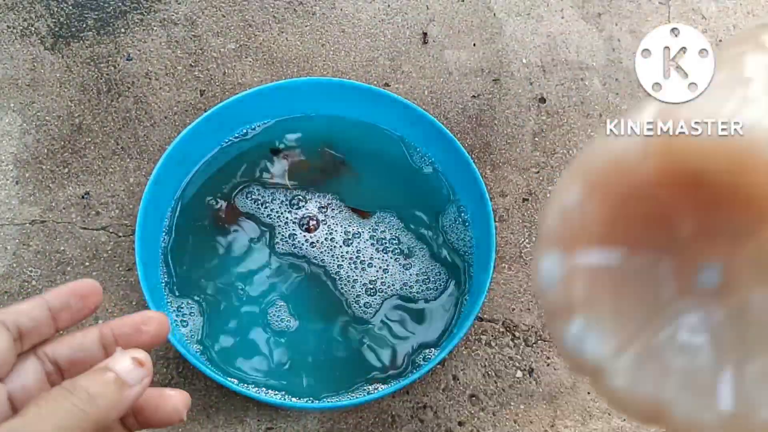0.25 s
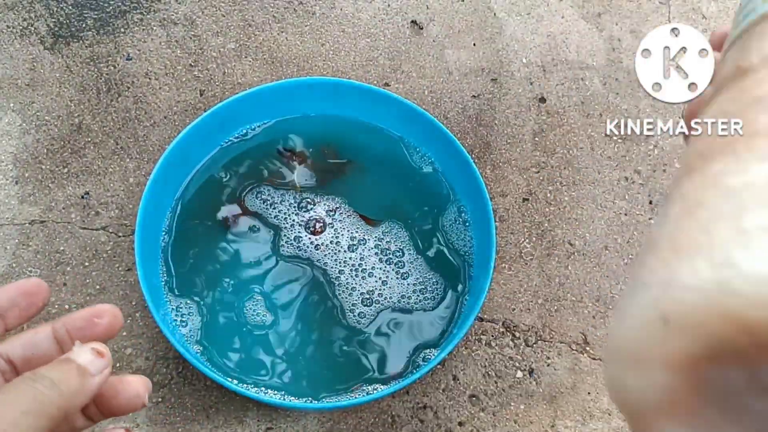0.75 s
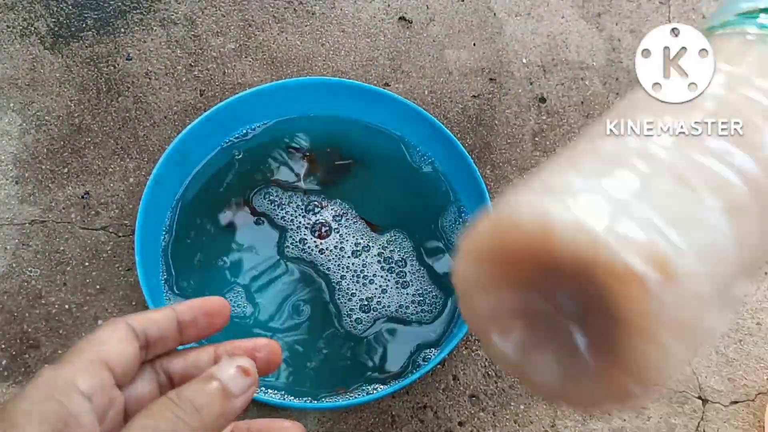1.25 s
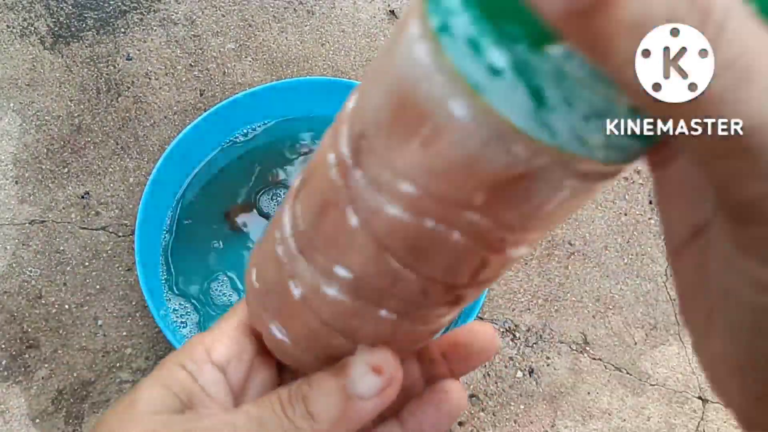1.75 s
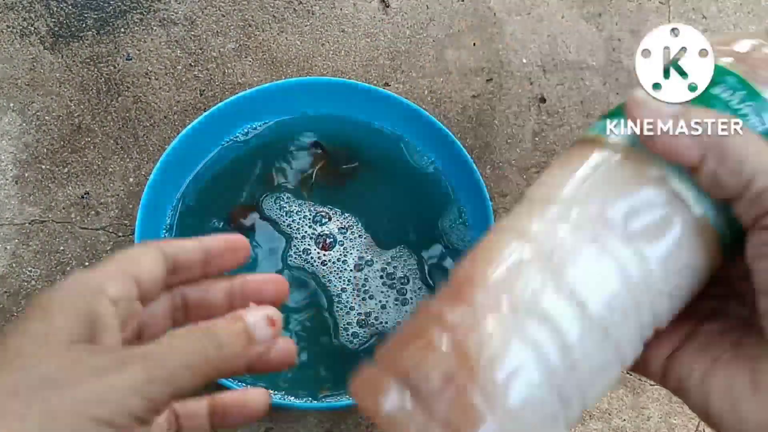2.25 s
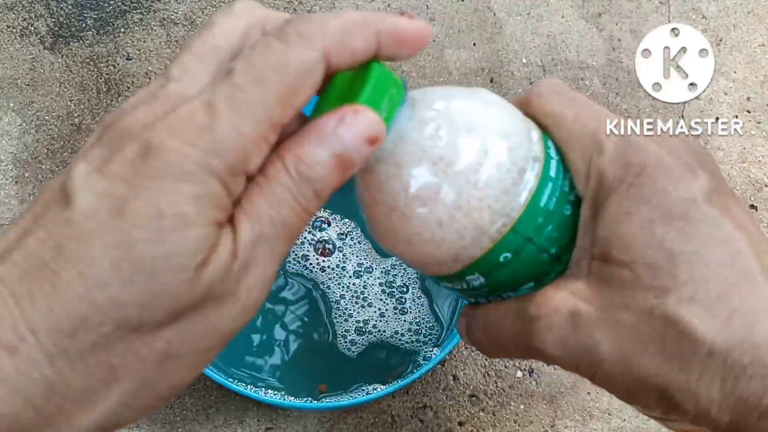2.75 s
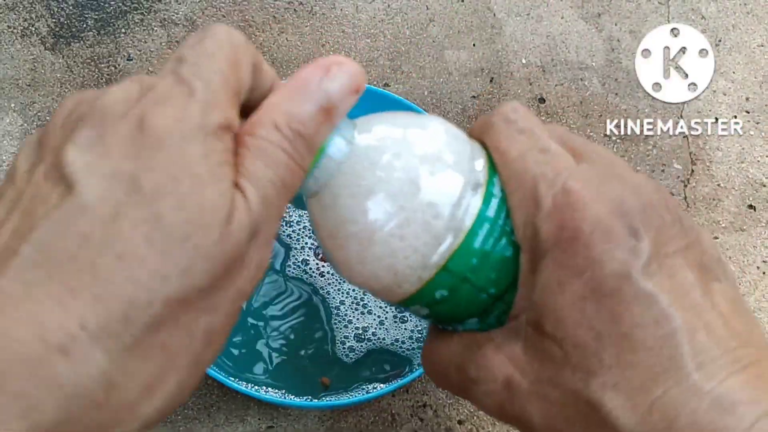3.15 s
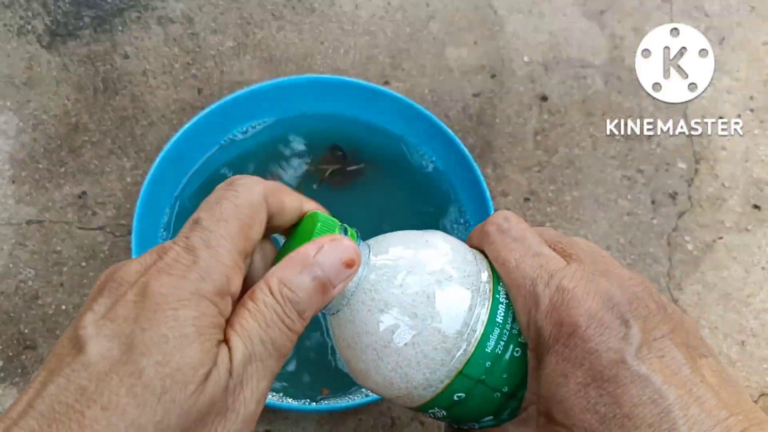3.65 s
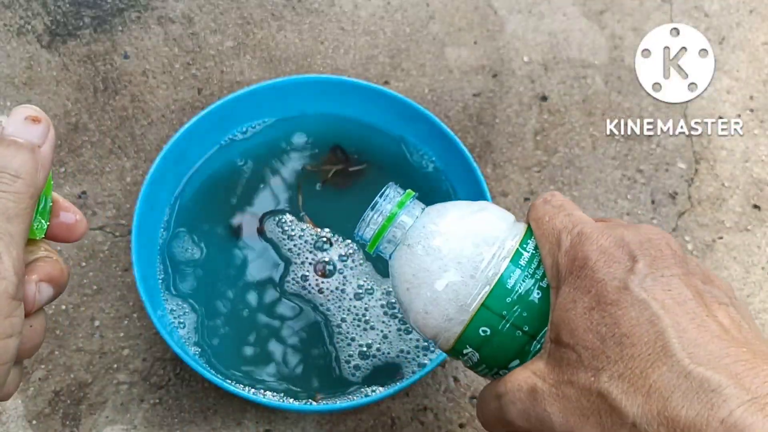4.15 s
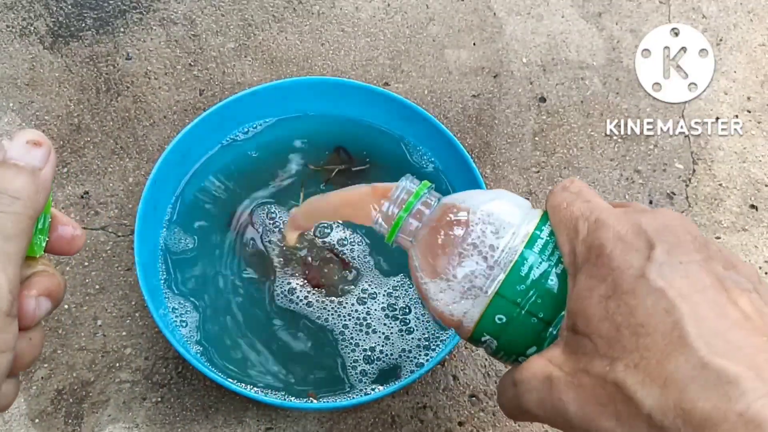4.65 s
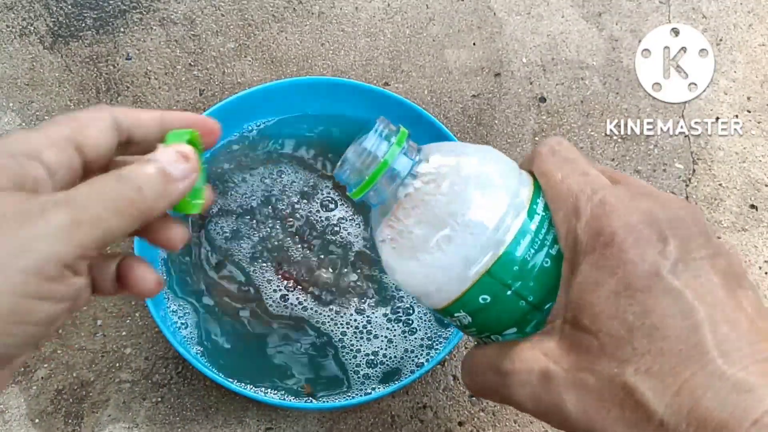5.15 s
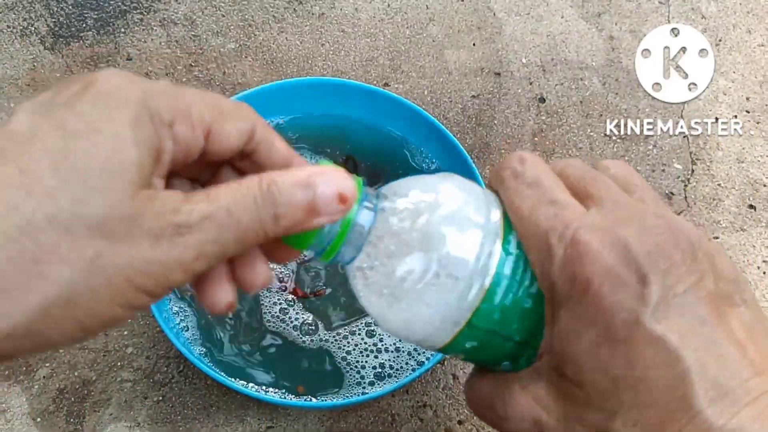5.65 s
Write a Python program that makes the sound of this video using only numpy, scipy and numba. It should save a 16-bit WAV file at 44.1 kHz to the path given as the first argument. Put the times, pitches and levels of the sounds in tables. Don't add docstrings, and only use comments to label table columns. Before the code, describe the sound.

Froth sloshes in a flexing plastic bottle, cap clicks open, liquid gurgles briefly into a water basin, and the cap clicks back on.

```python
import sys
import numpy as np
from scipy import signal
from scipy.fft import rfft, irfft, next_fast_len
from scipy.io import wavfile
from scipy.ndimage import uniform_filter1d
from numba import njit

SR = 44100
rng = np.random.default_rng(int(sys.argv[2]) if len(sys.argv) > 2 else 0)


def gain_from_db(level_db):
    decades = np.asarray(level_db, float) / 20
    return 10 ** decades


def wav_out(sig):
    wavfile.write(sys.argv[1], SR, np.round(np.clip(np.atleast_2d(sig).T, -1, 1) * 32767).astype(np.int16))


N = 260631

# frequency [Hz], density [dB per Hz].
TOWN_SPECTRUM = [(20, -1.5), (154, -16), (290, -23), (624, -28.5), (800, -32.5), (2500, -38), (7000, -49.5),
                 (15500, -47.5)]
# pitch [Hz], width [Hz], level [dB].
MACHINES = [(57.3, 12.4, -51.5), (122.3, 3.4, -62), (159.2, 8.5, -63.5)]
# start [s], level [dB], top frequency [Hz], decay [s].
KNOCKS = [(0.659, -45, 89, 0.085), (1.23, -47.5, 98, 0.095), (3.47, -48, 105, 0.12),
          (4.052, -42, 108.2, 0.057)]
# frequency [Hz], width [Hz], level [dB], left minus right [dB].
WALL_MODES = [(1760, 500, -7, -2), (2240, 160, 2, -4), (2900, 1650, -7, 1), (3800, 450, -3.5, -0.5),
              (4170, 300, -6.5, -1.5), (5100, 367, -8.5, -2), (5870, 2000, -10, -9.5),
              (7400, 810, -6, -2.5), (7900, 1100, -9, 0.5), (11600, 6000, -16.5, -3)]
# peak time [s], peak level [dB], rise over 10 dB [s], fall over 10 dB [s],
# heavy slap re peak [dB].
SHAKES = [(0.015, -42, 0.12, 0.022, -12), (0.09, -54, 0.074, 0.12, -1.5), (0.206, -47.5, 0.0041, 0.019, -1),
          (0.232, -47, 0.02, 0.045, -5), (0.308, -56, 0.0095, 0.065, 4.5), (0.48, -54, 0.04, 0.089, -5),
          (0.6, -63.5, 0.035, 0.081, 3), (0.694, -56, 0.015, 0.08, -13), (0.94, -64.5, 0.063, 0.063, -3.5),
          (1.026, -64, 0.01, 0.056, -7), (1.095, -81.5, 0.0088, .06, -4)]
TURNS = [(1.49, -68, 0.088, .15, -4), (1.642, -61, 0.034, 0.0088, -3.5), (1.79, -68, 0.052, 0.044, 2),
         (1.946, -69, 0.022, .03, -4), (2.005, -61, 0.037, 0.065, -17), (2.114, -54, 0.012, 0.022, -15),
         (2.152, -67.5, 0.014, 0.065, -1), (2.258, -68.5, 0.024, .1, -1.5), (2.55, -72, 0.23, .25, -2),
         (2.85, -71, 0.076, 0.5, -14), (5.8, -62, 0.086, 0.052, -3), (5.91, -66.5, 0.03, .04, -3)]
RUBS = [(2.76, -67.5, 0.04, 0.036, -5), (3.0, -75, 0.092, 0.15, 7), (3.135, -57, 0.02, 0.036, -21),
        (3.2, -64, 0.065, 0.049, -8), (3.28, -58, 0.024, 0.042, -7), (3.43, -58, 0.011, 0.021, -20),
        (3.465, -60.5, .02, 0.044, -18), (3.53, -50, 0.02, 0.012, 1), (5.25, -51, 0.027, 0.03, -3.5),
        (5.392, -58, 0.0078, 0.019, 3.5), (5.5, -58.5, 0.062, 0.029, -1), (5.56, -67, 0.047, .05, -2),
        (5.722, -54.5, 0.018, 0.029, 0.5)]
# start [s], peak [dB], dent pitch [Hz], treble re peak [dB], thud re peak [dB].
WALL_CRACKS = [(0.2924, -52, 3080, -5, -15), (0.519, -50, 3200, 14, -15), (0.609, -7, 3774, -4.5, -22),
               (0.7934, -40.5, 3160, 16, -4), (1.028, -43.5, 3300, -8, -19), (1.6326, -51, 3170, 0, -18),
               (1.642, -51, 2900, -14, -4), (2.0993, -55, 2200, -5, -19), (0.1785, -50, 4500, -11, -27),
               (0.1925, -48, 3070, -3, -27), (0.2039, -39, 2190, -12, -22), (0.2239, -35, 2270, 0, -19),
               (0.235, -41, 2280, -12, -22), (0.263, -41, 5000, -6, -26), (0.3277, -44, 3990, -10, -9),
               (0.4434, -45, 2250, -16, -18), (0.4633, -46, 2250, -8, -20), (0.5462, -47, 6600, 0, -22),
               (0.009, -36, 4200, -4, -24), (0.022, -43, 2250, -4, -15), (2.255, -56, 2050, -20, -25),
               (2.478, -52, 2250, -20, -14), (2.712, -63, 2000, -20, -13)]
OPENING_CRACKS = [(3.081, -28.5, 2160, -22, -24), (3.1145, -6.5, 2140, -4, -24),
                  (3.1724, -43.5, 2100, -22, -21), (3.187, -45, 2330, -22, -16),
                  (3.2735, -41, 2140, -28, -12), (3.3075, -45.5, 2260, -23, -14),
                  (3.4235, -47, 2180, -19, -38), (3.427, -45.5, 2030, -22, -33),
                  (3.4305, -41.5, 2240, -22, -30), (3.4345, -46, 1880, -20, -23),
                  (3.4385, -53, 2120, -20, -30), (3.487, -51, 2230, -26, -30), (3.490, -51, 2290, -26, -30),
                  (3.5093, -37.5, 2010, -22, -32), (3.5145, -46, 2150, -26, -30),
                  (3.5242, -33, 2200, -13, -16), (3.5286, -36, 2050, -24, -20),
                  (3.531, -41, 2050, -24, -23), (3.548, -51, 2200, -24, -22), (3.5529, -53, 2240, -22, -24),
                  (4.2805, -40.5, 2600, -5, -33)]
CLOSING_CRACKS = [(5.1545, -32.5, 2120, -31, -12.5), (5.197, -51, 1800, -25, -18),
                  (5.2134, -47, 1870, -25, -20), (5.221, -49, 1700, -25, -8), (5.239, -45, 2150, -20, -8),
                  (5.364, -50.5, 2300, -28, -17), (5.2352, -39, 2160, 6, -21), (5.248, -41, 2170, -22, -12),
                  (5.2643, -40, 2300, -10, -13), (5.2877, -43, 2250, -17, -14),
                  (5.3902, -39.5, 1760, -24, -19), (5.4719, -30, 1500, -8, -5),
                  (5.4742, -15, 2300, -12, -11), (5.478, -18.5, 2200, -11.5, -24),
                  (5.486, -35, 2600, -15, -16), (5.5933, -26.5, 2540, -28, -23),
                  (5.717, -33.5, 2040, -35, -15.5), (5.7254, -44, 2470, -31.5, -7),
                  (5.745, -43.5, 2000, -27, -27)]
# frequency [Hz], width [Hz], level [dB],
# left minus right [dB].
FREE_WALL_MODES = [(326, 310, -2.5, -1), (595, 184, -2, -9), (906, 280, -1.5, -7.5), (1635, 120, 0, 0),
                   (2240, 200, 7.5, -6.5), (2530, 253, 8, 0.5), (3300, 430, -19, -8), (4266, 280, 3, -3.5),
                   (4590, 215, -0.5, -6), (5850, 1100, -1.5, -5), (6580, 460, 0, -12.5),
                   (7640, 1100, -3.5, -3), (9500, 3100, -8.5, 2.5), (180, 120, -3, 0)]
TIGHT_CAP_MODES = [(604, 120, 2, 4), (260, 120, -3, 0), (1066, 230, 2.5, -4), (1300, 210, -14, 6),
                   (1800, 390, -10, -3.5), (2200, 247, 2, 2.5), (3450, 360, -1, 6.5), (4110, 490, -6.5, -4),
                   (4700, 400, -2.5, -4.5), (6300, 650, -5, -1), (6800, 360, 2.5, 0), (7300, 700, -1, 0.5),
                   (8540, 1500, -8.5, 3.5), (160, 99, -2, -0.5)]
LOOSE_CAP_MODES = [(340, 100, 1.5, 2), (1210, 335, 2.5, 8.5), (950, 220, 4, -2), (1500, 740, -12.5, 1),
                   (2250, 260, -5.5, 2.5), (3250, 250, 1, -3), (3560, 260, -0.5, -3), (4150, 370, -9, 2),
                   (5400, 390, 3, -2), (6500, 750, -3, -9), (8100, 400, 1.5, 7), (10200, 3800, -7, 5),
                   (190, 97, -6, -3)]
# dent left minus right [dB], ribs [dB], contact band width [Hz],
# ground echo [dB], basin echo [dB], tail [dB].
GRIPS = [
    (-11, -5, 5800, -14, -21.5, -13),
    (4, -6, 2000, -22.5, -16, -2),
    (-5.5, -4, 1800, -14, -21, -1.5),
]
# start [s], length [s], start pitch [Hz], end pitch [Hz], level [dB].
BIRD_NOTES = [(0.275, 0.165, 4080, 3750, -65), (0.419, 0.13, 3690, 3750, -68.5),
              (1.429, 0.19, 1620, 1660, -74.5), (1.545, 0.057, 4350, 5300, -71),
              (1.577, 0.1, 5300, 5300, -74), (2.249, 0.22, 3980, 3530, -71), (2.409, 0.13, 3650, 5300, -68),
              (2.482, 0.05, 5460, 5660, -65), (2.547, .055, 5530, 5560, -74),
              (2.508, 0.033, 3050, 3070, -57.5), (2.754, 0.034, 2900, 2850, -59),
              (2.822, 0.16, 1280, 1200, -64.5), (2.799, 0.07, 1017, 1060, -69),
              (2.865, 0.044, 3020, 2980, -67), (2.753, .03, 1660, 1640, -66), (2.75, .03, 2250, 2240, -66),
              (2.972, 0.08, 1190, 976, -72), (3.01, .05, 1560, 1480, -73), (3.279, 0.0097, 2950, 2950, -56),
              (3.304, 0.12, 3760, 3740, -72.5), (3.455, 0.033, 4150, 4400, -65),
              (3.018, 0.024, 2965, 2900, -54), (3.047, 0.046, 2950, 2900, -61),
              (5.006, 0.11, 1265, 1203, -69.5), (5.599, 0.13, 1250, 1206, -72)]
# time [s], level [dB].
FLOW = [
    (4.22, -38),
    (4.3, -7),
    (4.39, -1.5),
    (4.52, 3),
    (4.7, -3),
    (4.88, -6),
    (4.98, -19),
]
# start [s], peak [dB], pitch [Hz], ring t60 [s].
GLUGS = [(3.428, -52.5, 520, 0.07), (4.314, -47, 746, 0.017), (4.366, -38, 957, 0.027),
         (4.383, -59, 890, 0.025), (4.409, -40.5, 870, 0.018), (4.431, -61, 950, 0.025),
         (4.462, -50, 950, 0.055), (4.47, -36.5, 1024, 0.026), (4.475, -43.5, 835, 0.028),
         (4.504, -41, 990, 0.024), (4.524, -40, 974, 0.025), (4.531, -43, 910, 0.018),
         (4.552, -31.5, 905, 0.0077), (4.563, -45, 1010, 0.018), (4.572, -52, 934, 0.023),
         (4.604, -48, 930, 0.026), (4.622, -30.5, 915, 0.0089), (4.636, -49, 1010, 0.043),
         (4.655, -32.5, 970, 0.011), (4.667, -50, 914, 0.027), (4.679, -54, 1060, 0.039),
         (4.782, -45, 930, 0.027), (4.836, -45, 1210, 0.014), (4.865, -34.5, 718, 0.054),
         (4.888, -51, 745, 0.038), (4.911, -50.5, 900, 0.015), (4.724, -57, 900, 0.014),
         (4.738, -52, 950, .018)]
# start [s], peak [dB], pitch [Hz], left minus right [dB].
BEADS = [(4.2633, -48, 4500, 2), (4.2797, -41.5, 2320, 8.5), (4.3136, -40, 9550, 10.5),
         (4.316, -40.5, 4800, 1.5), (4.328, -35.5, 3700, 3.5), (4.3521, -61, 1680, 4),
         (4.391, -41, 2420, 8), (4.391, -36, 5060, -3.5), (4.4317, -41, 3300, -0.5),
         (4.464, -41, 2030, 1.5), (4.4913, -28, 3410, 3.5), (4.525, -41, 3260, 15), (4.551, -37, 6030, 3),
         (4.614, -52, 1910, 1), (4.6378, -47, 1640, 3), (4.6529, -50, 1760, 2), (4.6864, -47, 8500, 8.5),
         (4.7218, -41, 3300, 3.5), (4.722, -51, 7340, 10), (4.791, -45, 8100, 5),
         (4.7916, -44.5, 7200, 13.5), (4.8255, -50, 1980, 2), (4.862, -51, 1800, 11),
         (4.862, -46.5, 7400, 12), (4.888, -54, 1610, 14), (4.5287, -39, 2060, 2.5), (4.766, -56, 5700, 3),
         (4.8016, -46, 6000, 3), (4.828, -44, 3800, 2), (4.855, -48, 2000, 0), (4.873, -45, 1800, -1),
         (4.889, -43, 2630, 1), (4.911, -51, 2820, -1), (4.383, -44, 3000, 0)]
# start [s], peak [dB].
SPLASHES = [(4.2921, -42.5), (4.3141, -38), (4.3909, -52), (4.5454, -38), (4.5501, -35.5), (4.557, -36),
            (4.6214, -46), (4.6528, -43), (4.6867, -51), (4.7132, -49), (4.7595, -45), (4.8884, -44),
            (4.3521, -46), (4.416, -55), (4.4309, -52), (4.4903, -50), (4.5242, -58), (4.614, -50),
            (4.6379, -49), (4.836, -51), (4.7915, -54), (4.8024, -48), (4.8259, -43), (4.8618, -42),
            (4.8828, -44.5), (4.9257, -45)]
# frequency [Hz], width [Hz], boost [dB].
PORTS = [
    (7640, 1060, 7.5),
    (3750, 980, 4),
]

TOWN_DB = -52
SHAKE_SPRAY_DB, TURN_SPRAY_DB, RUB_SPRAY_DB = 1, 0.4, -14.5
SHAKE_PAN_DB, TURN_PAN_DB = -1, 3
HEAVY_DULLS = 2.1
THUD_HZ, RIBS_HZ, TREBLE_HZ = 1280, 2900, 5200
BEND, BREAK_DB = 1.3, 4
BLUR, GLIDE_BLUR = 0.0032, 0.35
LARGE_DB, MIDDLE_DB, FINE_DB = -61, -56.5, -64
LARGE_SLOPE, FINE_SLOPE = 2.1, 0.49
GURGLE_DB = -57
BEAD_T60_S, GLUG_PAN_DB, SPLASH_DECAY_S = 0.016, 1.5, 0.0038
DULL_HZ, AIR_HZ, AIR_DB = 8640, 11690, -11
TOP_HZ = 15550


def level(x, db):
    return x * gain_from_db(db) / np.sqrt(np.mean(x ** 2))


def curve(table):
    s, *columns = np.transpose(table)
    return [np.interp(np.arange(N) / SR, s, c) for c in columns]


def band(x, hz, width):
    return signal.lfilter(*signal.iirpeak(min(hz, 0.45 * SR), hz / width, SR), x)


def walk(rate):
    k = int(SR / rate)
    held = np.repeat(rng.standard_normal(N // k + 1), k)
    return 1.1 * uniform_filter1d(uniform_filter1d(held, k), k)[:N]


def panned(db):
    return gain_from_db(np.array([db, -db]) / 2)


def two_sides(mid, side, alike):
    return mid + side * np.sqrt(1 - alike) * np.array([[1], [-1]])


@njit
def rings(s, hz, t60, rise, glide, gains, lag, n):
    out = np.zeros((2, n))
    for e in range(len(s)):
        start, length, phase = int(s[e] * SR), int(t60[e] * SR), 0.
        for i in range(max(0, min(length, n - start))):
            phase += 2 * np.pi * hz[e] * (1 + glide * i / length) / SR
            size = np.exp(-np.log(1000) * i / length) * (1 - np.exp(-i / (rise * SR)))
            out[0, start + i] += gains[0, e] * size * np.sin(phase)
            out[1, start + i] += gains[1, e] * size * np.sin(phase - 2 * np.pi * hz[e] * lag[e])
    return out


def swarm(lo_hz, hi_hz, rate, cycles, spread_db, pan_db, span):
    seconds = span[1] - span[0]
    where, size, loud, side = rng.random((int(rate * seconds), 4)).T
    side = 2 * side - 1
    hz = lo_hz * (hi_hz / lo_hz) ** size
    gains = gain_from_db(-spread_db * np.log(1 - loud)) * panned(pan_db * side)
    lag = 0.00014 + 0.00017 * side
    x = rings(span[0] + where * seconds, hz, cycles / hz, 0.00044, 0.12, gains, lag, N)
    return level(x, 0) * np.sqrt(seconds * SR / N)


def droplets(patchy_db, alike):
    mid, side = rng.standard_normal((2, N)) * gain_from_db(patchy_db * np.array([walk(500), walk(500)]))
    return two_sides(mid, side, alike)


def town():
    n = next_fast_len(N)
    f = np.arange(n // 2 + 1) * SR / n + 1
    hz, db = np.transpose(TOWN_SPECTRUM)
    alike = np.clip(0.81 / (1 + (f / 450) ** 4), 0, 1)
    mid, side = rfft(rng.standard_normal((2, n)))
    both = two_sides(np.sqrt(1 + alike) * mid, side, alike)
    spectrum = both * (f > 16) * gain_from_db(np.interp(np.log(f), np.log(hz), db))
    air = level(irfft(spectrum, n)[:, :N], TOWN_DB)

    noise = rng.standard_normal((4, N))
    shared = noise[0] + 0.38 * noise[1:3]
    hum = sum(level(band(band(shared, hz, width), hz, width), db) for hz, width, db in MACHINES)

    t, knocks = np.arange(N) / SR, 0
    for s, db, top, decay in KNOCKS:
        u = np.maximum(t - s, 0) / decay * 3
        thump = band(band(band(noise[3], top, top), top, 1.7 * top), top, 2 * top)
        knocks = knocks + u * np.exp(1 - u) * level(thump, db)
    s, db, top, decay = np.transpose(KNOCKS)
    jolts = rings(s + 0.0047, 0.89 * top, 1.04 * decay, 0.004, -0.54, gain_from_db(db + 7.5) * np.ones((2, 1)), 0 * s, N)
    return panned(0.78)[:, None] * (gain_from_db(0.3 * walk(5.8)) * air + hum) + knocks + jolts


def wall(x, modes, lo=0, hi=SR, damp=1, sway=lambda: 1):
    out = 0
    for k, (hz, width, db, pan) in enumerate(modes):
        if lo < hz <= hi:
            gains = (-1) ** k * gain_from_db(db) * panned(pan)
            out = out + gains[:, None] * band(x, hz, width * damp) * sway()
    return out


def swells(table):
    s, db, rise, fall, slap_db = np.transpose(table)[..., None]
    t = np.arange(0, N / SR + 0.001, 0.001)
    size = gain_from_db(db - 10 * np.maximum((t - s) / fall, (s - t) / rise))
    spray_db = -HEAVY_DULLS * np.maximum(slap_db + 3.5, 0)
    return curve(np.transpose([t] + [(size * gain_from_db(d)).sum(axis=0) for d in (0, spray_db, slap_db)]))


def wash():
    def patch():
        return gain_from_db(3.0 * walk(45))
    body = level(wall(droplets(2.3, 0.18), WALL_MODES, hi=TREBLE_HZ, sway=patch), 0)
    spray = level(wall(droplets(3.5, 0.26), WALL_MODES, TREBLE_HZ, sway=patch), 0)
    slap = swarm(250, 1300, 900, cycles=4.08, spread_db=3.0, pan_db=5.0, span=(0, N / SR))
    out, flutter = 0, gain_from_db(1.0 * walk(40))
    for table, spray_db, pan_db in ((SHAKES, SHAKE_SPRAY_DB, SHAKE_PAN_DB),
                                    (TURNS, TURN_SPRAY_DB, TURN_PAN_DB),
                                    (RUBS, RUB_SPRAY_DB, TURN_PAN_DB)):
        if table is RUBS:
            body = level(band(body, 2330, 1598), 0)
        surge, mist, heavy = swells(table)
        light = surge * panned(pan_db)[:, None] * body + mist * gain_from_db(spray_db) * spray
        out = out + flutter * light + heavy * slap
    return out


def crack(db, hz, treble_db, thud_db, modes, grip, sign):
    pan_db, ribs_db, contact_hz, ground_db, basin_db, tail_db = grip
    t = np.arange(4096) / SR
    noise = rng.standard_normal((3, 4096))
    snap = gain_from_db(-19.5) * noise * np.exp(-t / 0.00115)
    snap[:, 0] += 1
    damp = 1.5 + max(-16.0 - db, 0) / 45
    dent = panned(pan_db)[:, None] * band(snap[0], hz, 0.086 * hz * damp)
    dent = band(dent + wall(snap[0], modes, THUD_HZ, RIBS_HZ, damp), 2500, contact_hz * damp)
    ribs = band(wall(snap[1], modes, RIBS_HZ, TREBLE_HZ, damp), 4150, 3000)
    treble = band(wall(snap[1:], modes, TREBLE_HZ), 7550, 7000)
    thud = band(wall(snap[0], modes, hi=THUD_HZ), 699, 2000)
    parts = ((dent, 0), (ribs, 0.5 * treble_db + ribs_db), (treble, treble_db), (thud, thud_db + 5))
    near = sum(gain_from_db(d) * x / np.abs(x).max() for x, d in parts)
    near = near / np.abs(near).max()
    near = near + gain_from_db(ground_db) * np.roll(near, int(0.0026 * SR), axis=1)
    direct = near
    near = direct + gain_from_db(basin_db) * np.roll(direct, int(0.0062 * SR), axis=1)
    echoes = band(noise[1:], 3400, 3000) + gain_from_db(treble_db + 3) * band(noise[1:], 6300, 3600)
    fade = gain_from_db(-17.0 + tail_db) * np.exp(-t / 0.0045) + gain_from_db(-40.5) * np.exp(-t / 0.037)
    return sign * near + echoes * fade * (1 - np.exp(-t / 0.0016))


def cracks():
    out, k = np.zeros((2, N + 4096)), 0
    groups = zip((WALL_CRACKS, OPENING_CRACKS, CLOSING_CRACKS),
                 (FREE_WALL_MODES, TIGHT_CAP_MODES, LOOSE_CAP_MODES), GRIPS)
    for table, modes, grip in groups:
        for s, db, hz, treble_db, thud_db in table:
            both = crack(db, hz, treble_db, thud_db, modes, grip, (-1) ** k)
            i, k = int(s * SR), k + 1
            out[0, i + 3:i + 4099] += gain_from_db(db + 2) * both[0]
            out[1, i:i + 4096] += gain_from_db(db + 3.5) * both[1]
    return out[:, :N]


def birds():
    out = np.zeros((2, N))
    for s, length, from_hz, to_hz, db in BIRD_NOTES:
        n = int(length * SR)
        u = np.arange(n) / n
        phase = 2 * np.pi * np.cumsum(from_hz + (to_hz - from_hz) * u ** BEND) / SR
        glide_hz = abs(to_hz - from_hz)
        k = int(SR / (BLUR * from_hz / length + GLIDE_BLUR * glide_hz))
        clear = (1950 / from_hz) ** 2 * min(length / 0.096, 1) / (1 + glide_hz / 600)
        waver = uniform_filter1d(uniform_filter1d(rng.standard_normal((2, 2, 16384)), k), k)
        a, b = waver[..., :n] * np.sqrt(k)
        note = ((clear + a) * np.sin(phase) + b * np.cos(phase)) / np.hypot(clear, 1.2) * 1.4
        out[:, int(s * SR):int(s * SR) + n] += gain_from_db(db) * np.sin(np.pi * u) ** 0.38 * note
    out = out * gain_from_db(BREAK_DB * np.minimum(walk(45), 0))
    return out + 0.19 * np.roll(out, int(0.017 * SR), axis=1) + 0.15 * np.roll(out[::-1], int(0.028 * SR), axis=1)


def bubbles(s, db, hz, t60, pan_db, rise, glide):
    gains = gain_from_db(db) * panned(pan_db)
    return rings(s, hz, np.clip(t60, 0.004, 0.2), rise, glide, gains, 0.0001 + 0.00002 * pan_db, N)


def glugs():
    s, db, hz, t60 = np.transpose(GLUGS)
    side = GLUG_PAN_DB + 0 * s
    plop = bubbles(s, 0.77 * db - 12.5, 1.47 * hz, 0.36 * t60, side, 0.0003, 0.19)
    ring = bubbles(s, db + 8.0, hz, t60, side, 0.00083, 0.099)
    pinch = bubbles(s, db - 7.0, 2.96 * hz, 0 * s, side, 0.00005, -0.36)
    return plop + ring + pinch


def beads():
    s, db, hz, side = np.transpose(BEADS)
    t60 = BEAD_T60_S + 0 * s
    return sum(bubbles(s, db - 1.5, tune * hz, t60, side, 0.00062, 0.055) for tune in (0.98, 1.03))


def pour():
    flow_db, = curve(FLOW)
    span = (FLOW[0][0], FLOW[-1][0])
    t = np.arange(N) / SR
    inside = (t > span[0]) & (t < span[1])
    large = swarm(635, 1670, 500, cycles=15.0, spread_db=5.0, pan_db=3.0, span=span)
    middle = swarm(1550, 4520, 1100, cycles=31.0, spread_db=2.5, pan_db=9.0, span=span)
    fine = swarm(4370, 12100, 1400, cycles=32.0, spread_db=2.5, pan_db=7.0, span=span)
    churn = droplets(5.9, 0.15) * gain_from_db(6.1 * walk(60))
    gurgle = gain_from_db(GURGLE_DB + flow_db) * level(band(band(churn, 1100, 1000), 1100, 1900), 0)
    large = gain_from_db(LARGE_DB + LARGE_SLOPE * flow_db) * large
    middle = gain_from_db(-3) * middle + level(band(churn, 2400, 2600), -5.5)
    middle = gain_from_db(MIDDLE_DB + flow_db) * middle
    fine = gain_from_db(-1.5) * fine + level(band(churn, 7500, 5000), -7)
    fine = gain_from_db(FINE_DB + FINE_SLOPE * flow_db) * fine
    return large + inside * (gurgle + middle + fine) + glugs() + beads()


def splashes():
    bursts, t = np.zeros(N + 2048), np.arange(2048) / SR
    for s, db in SPLASHES:
        bursts[int(s * SR):int(s * SR) + 2048] += gain_from_db(db) * np.exp(-t / SPLASH_DECAY_S)
    drops = droplets(3.3, 0.17)
    return bursts[:N] * (level(band(drops, 7100, 6000), -7.5) + level(band(drops, 3100, 2600), -18.5))


def scene():
    near = wash() + cracks() + pour() + splashes()
    dull = signal.lfilter(*signal.butter(3, DULL_HZ, fs=SR), near)
    airy = signal.lfilter(*signal.butter(3, AIR_HZ, "high", fs=SR), near)
    heard = dull + gain_from_db(AIR_DB) * airy + birds() + town()
    return np.array([x + (gain_from_db(db) - 1) * band(x, hz, width) for x, (hz, width, db) in zip(heard, PORTS)])


def low_pass(x):
    return signal.sosfilt(signal.butter(12, 16550, fs=SR, output="sos"), x)


def record(dry):
    top_cut = signal.ellip(8, 0.2, 60, TOP_HZ, fs=SR, output="sos")
    mix = signal.sosfilt(top_cut, np.clip(dry, -1, 1))
    return low_pass(mix)


dry = scene()
out = record(dry)
wav_out(out)
```